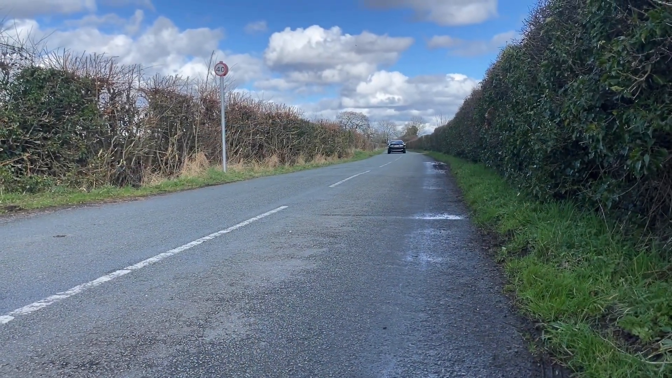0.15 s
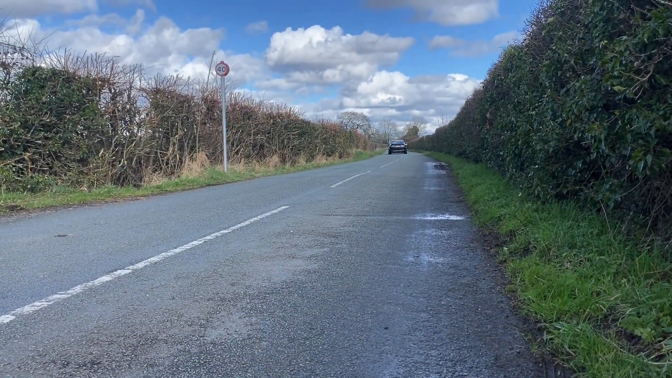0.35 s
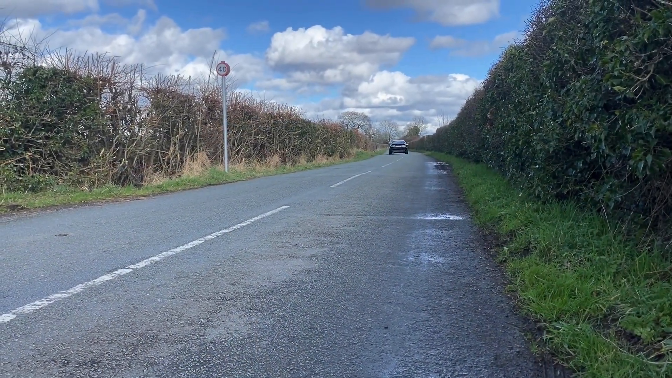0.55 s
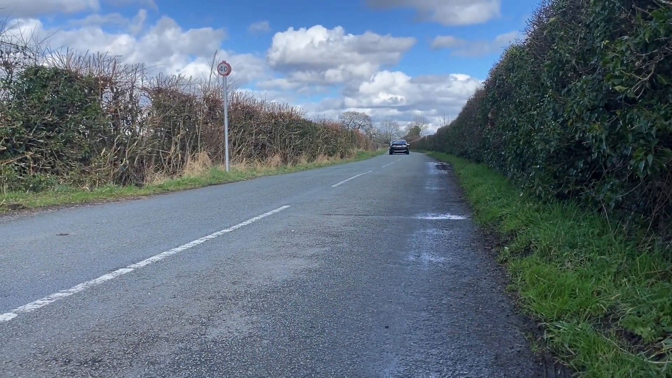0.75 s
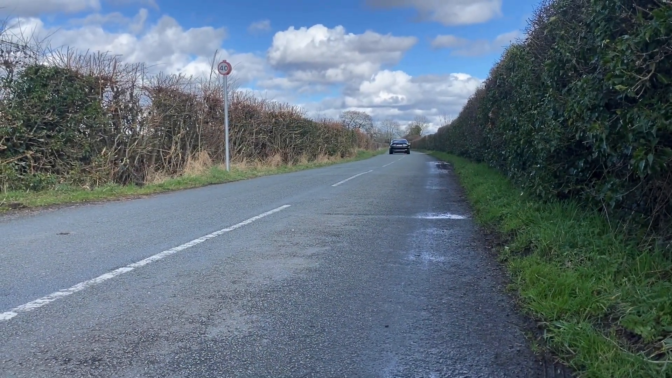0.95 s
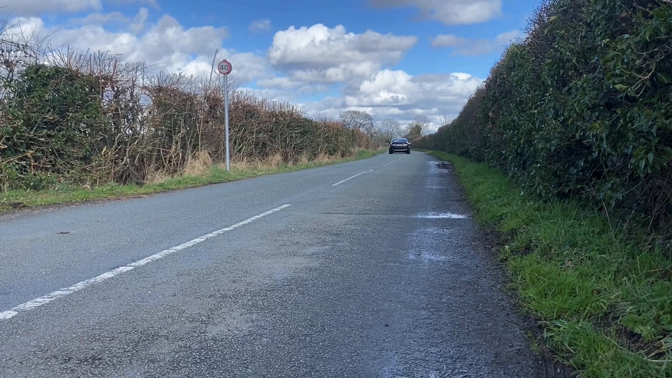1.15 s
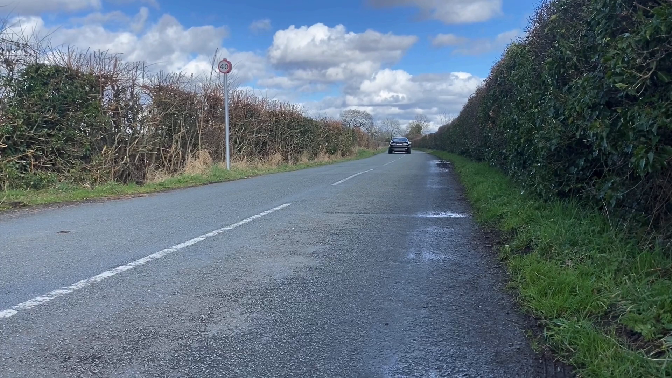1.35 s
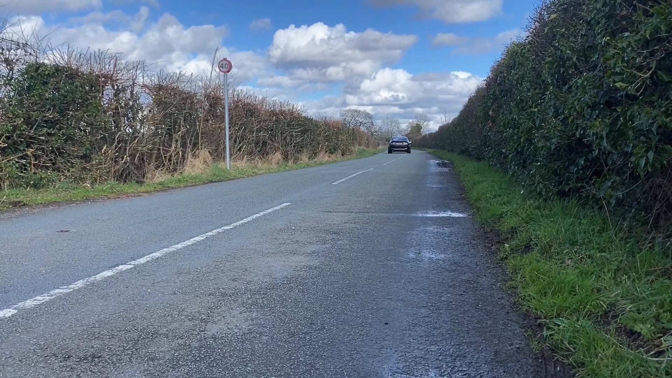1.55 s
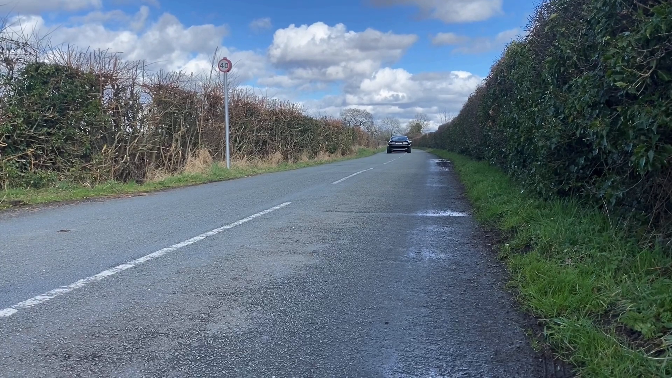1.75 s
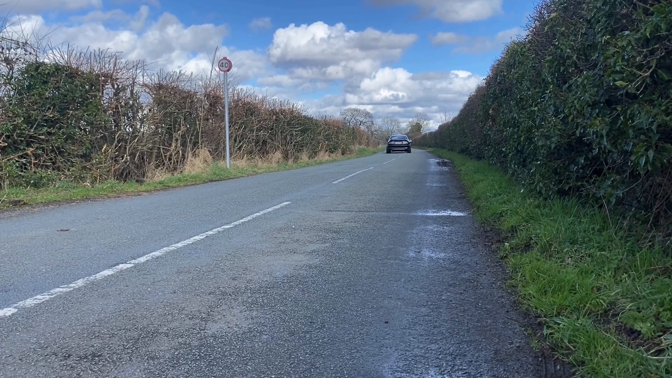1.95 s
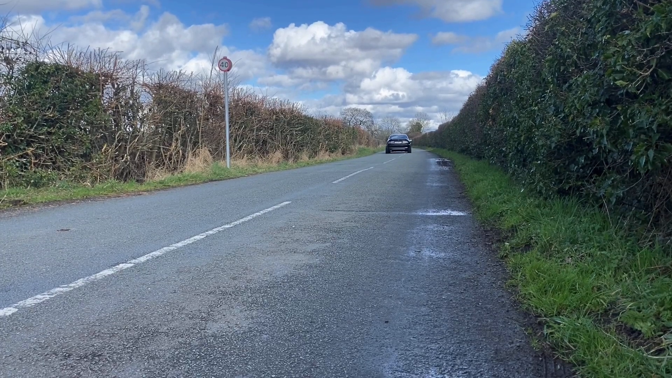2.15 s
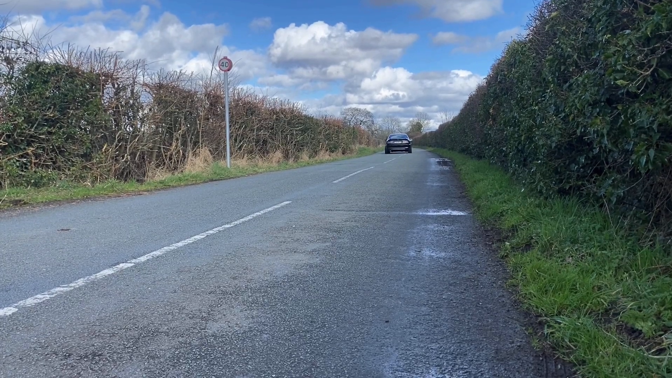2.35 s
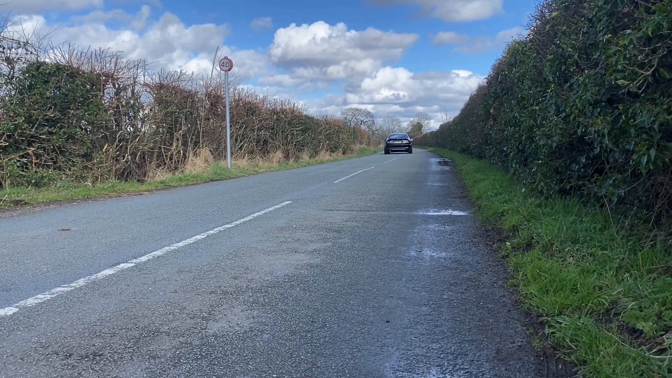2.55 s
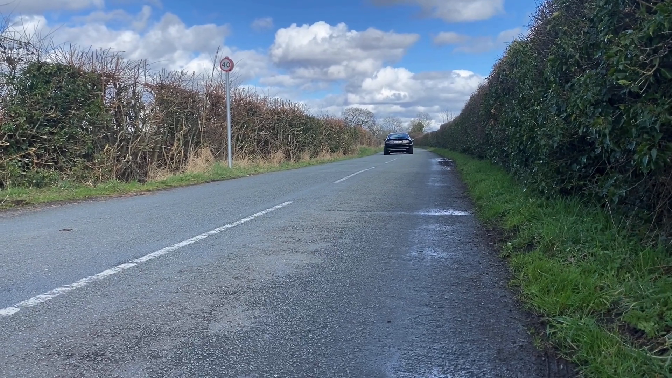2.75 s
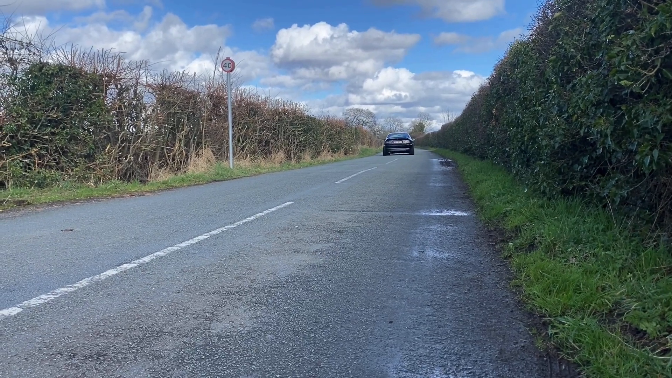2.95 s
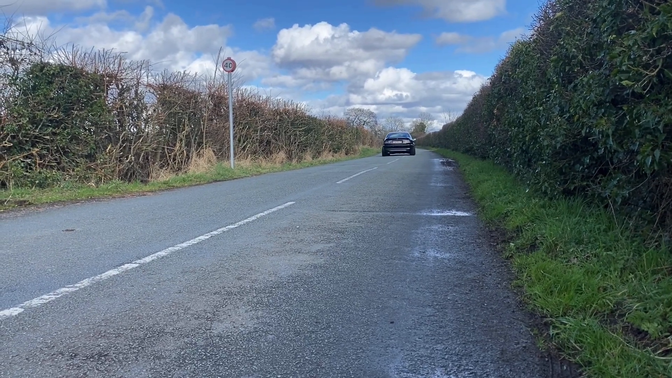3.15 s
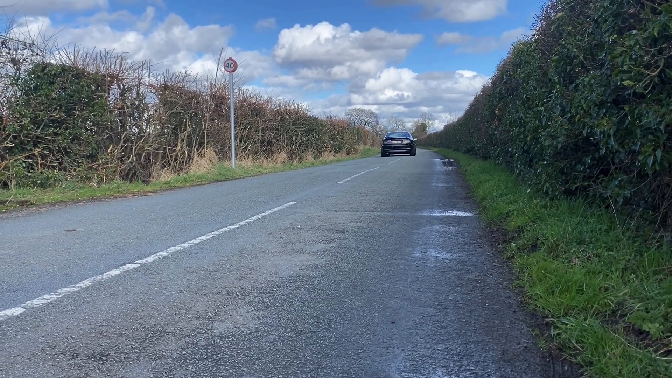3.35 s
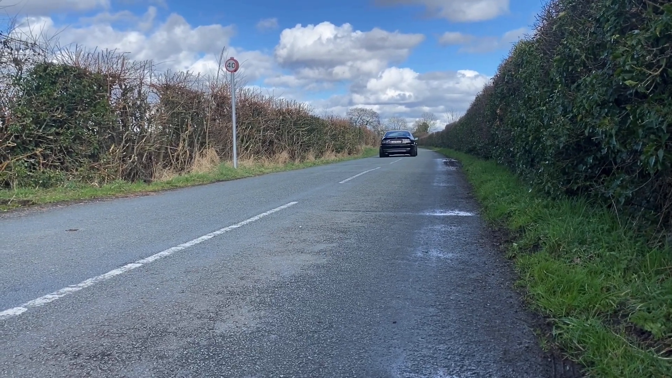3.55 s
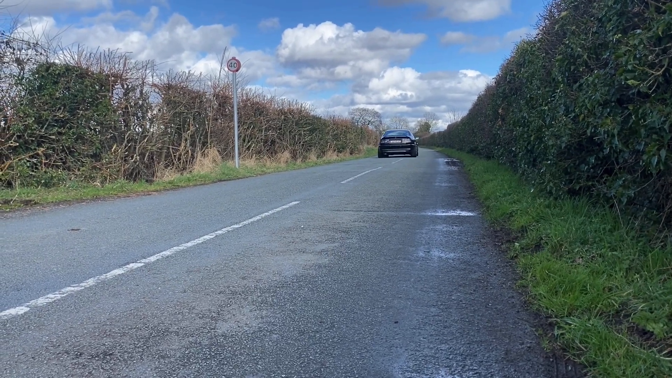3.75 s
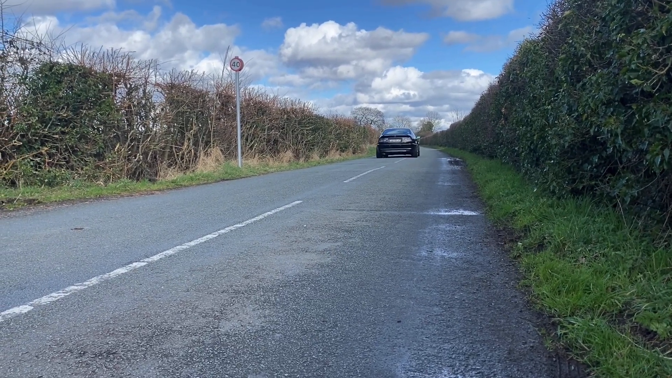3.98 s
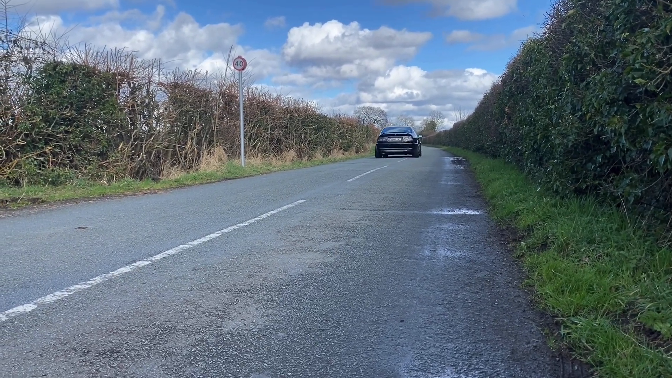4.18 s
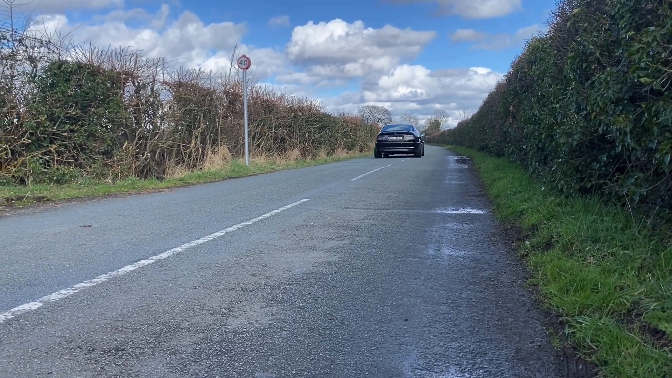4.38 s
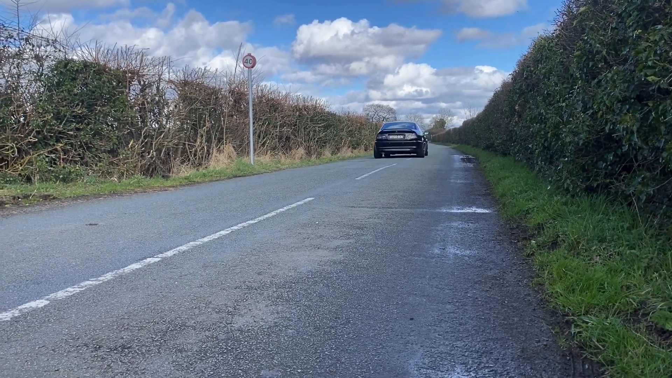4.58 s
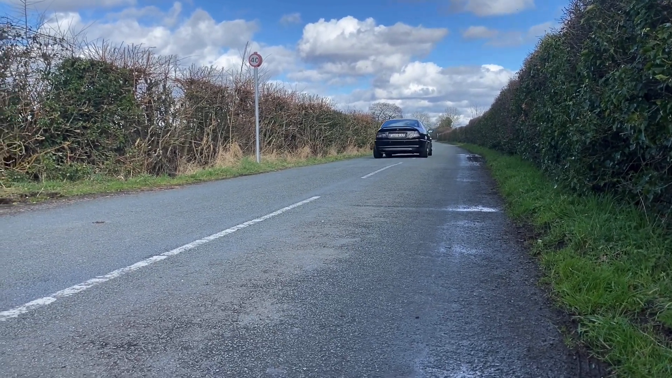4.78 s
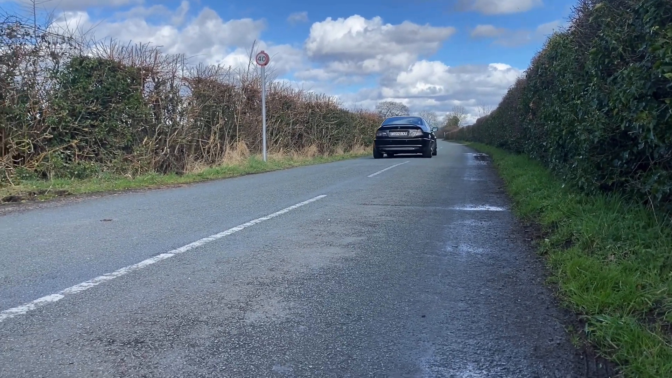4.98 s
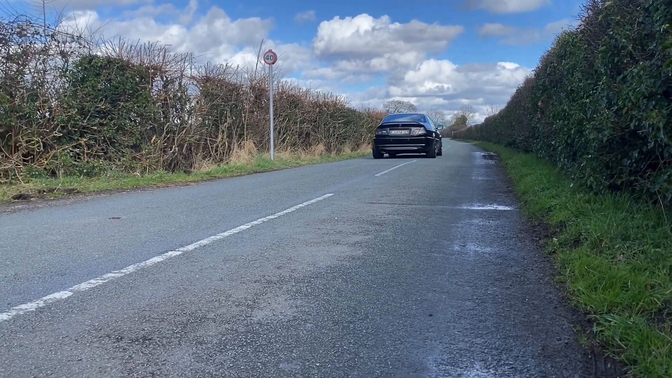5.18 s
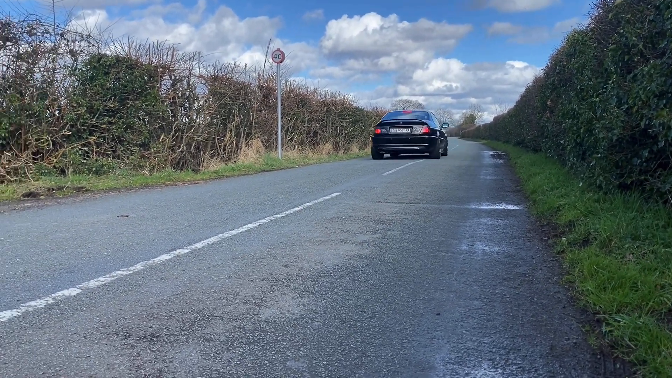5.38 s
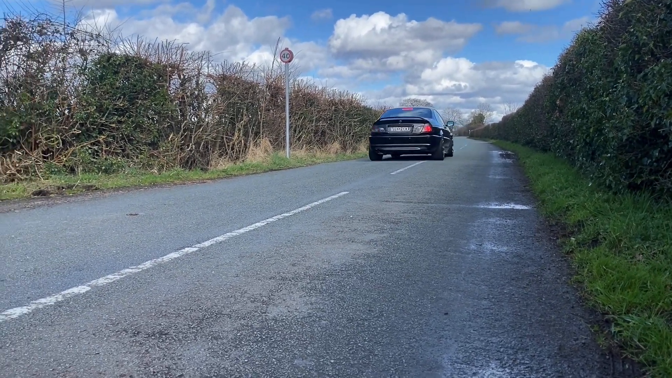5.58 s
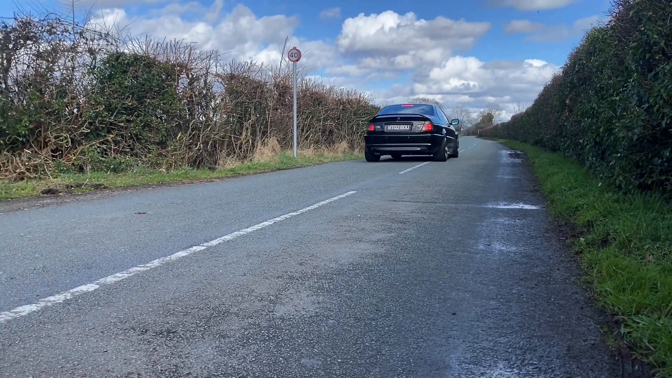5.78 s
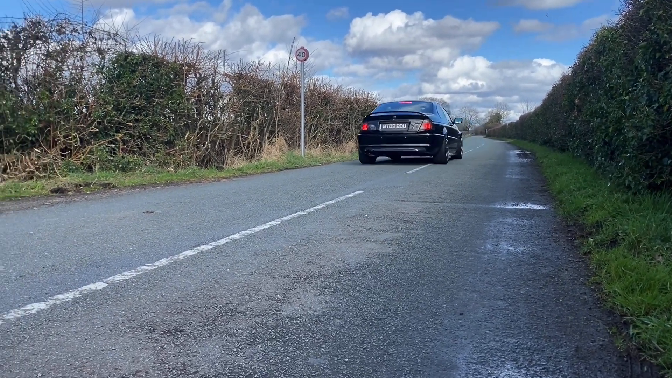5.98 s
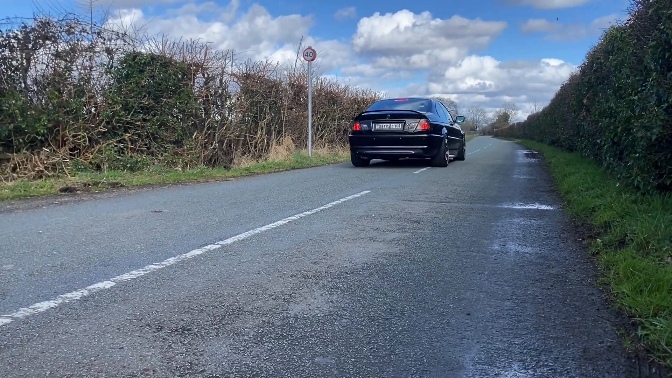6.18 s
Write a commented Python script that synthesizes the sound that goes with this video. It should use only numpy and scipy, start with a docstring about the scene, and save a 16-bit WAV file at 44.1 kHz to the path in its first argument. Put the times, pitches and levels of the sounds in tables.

```python
"""A six-cylinder engine, firing unevenly, rings its exhaust as a car backs nearer along a hedged lane,
lifts off and slows. The strongest orders are sines, one of them the whine of a reverse gear.
Unburnt fuel thuds in the silencer (swelling sines), cracks at the tailpipe (decaying modes)
and spits there (noise bursts). Gas and tyres hiss and leaves stir as filtered noise;
the hedges return short echoes of the cracks."""
import sys
import numpy as np
from scipy import signal
from scipy.fft import rfft, irfft, next_fast_len
from scipy.io import wavfile
from scipy.ndimage import uniform_filter1d

SR = 44100
rng = np.random.default_rng(int(sys.argv[2]) if len(sys.argv) > 2 else 0)


def invert_db(x):
    """Field ratio 10**(x/20) for x, a level in decibels (scalar or array-like)."""
    u = np.asarray(x, float) / 20
    return 10 ** u


def generate_wav(signal):
    """Clip the signal to [-1, 1] and save it as 16-bit WAV at the path in sys.argv[1]."""
    frames = np.transpose(np.atleast_2d(signal))
    scaled = np.clip(frames, -1, 1) * 32767
    pcm = np.round(scaled).astype(np.int16)
    wavfile.write(sys.argv[1], SR, pcm)


N = 274654
T = np.arange(N) / SR

# Engine states: steady, lifting off, ragged overrun, pulling again.
# One row a change between them: start t/s, end t/s
CHANGES = [(2.2, 2.85), (3.64, 3.85), (5.7, 5.8)]
# Engine speed: t/s, firing rate f/Hz
FIRING_RATE = [(0, 164.8), (.1, 165.7), (.25, 163.9), (.45, 165.8), (.62, 164.6), (.78, 165.4),
               (1.35, 165.7), (1.55, 164.7), (1.9, 163.6), (2.17, 164.1), (2.4, 162.6), (2.62, 162.7),
               (2.85, 159.1), (3.12, 158.9), (3.25, 156.5), (3.65, 152.9), (3.88, 148.4), (4.25, 144.8),
               (4.45, 139.5), (5.07, 125.5), (5.3, 119.5), (5.46, 118.7), (5.6, 111.6), (5.76, 104.4),
               (5.9, 99.45), (6, 97.6), (6.12, 93.4), (6.23, 86.8)]
# Approach of the car: t/s, exhaust level/dB, drone level of the silencer chambers/dB
NEARING = [(0, -35, -43.5), (.55, -34.5, -42), (1.5, -31.5, -45), (2.7, -29.5, -40), (3.3, -27, -30),
           (3.6, -24.5, -27), (3.76, -27.5, -29.5), (4.1, -23, -27), (4.55, -17, -27), (5.15, -13.5, -22),
           (5.45, -8.5, -30.5), (5.7, -15.5, -40), (6.23, -14.5, -24.5)]

# Cylinders: strength level/dB, lateness/share of the firing gap
CYLINDERS = [(7, 0.037), (1.5, 0.12), (3.5, -0.0066), (-1.5, 0.21), (4, 0.21), (3, 0.011)]
# Exhaust response: f/Hz, relative level per Hz/dB
EXHAUST = [(24, -56), (40, -5), (87, 10.5), (135, -4.5), (170, 1), (192, -16.5), (218, -21.5), (247, -0.5),
           (274, -7), (329, 1), (355, -8.5), (390, -18.5), (425, -11), (481, -9), (535, -11.5), (747, -0.5),
           (981, -34), (1500, -31), (1950, -62.5), (3300, -120)]
THROB_DB = (-2.5, -2, 1.5, -4)  # over the exhaust level, in each state
SCATTER_DB = (.8, 2.5, 3.5, 1)  # unevenness of the firings in each state
BITE_DB, DULLING_DB_PER_S = (0, -3, -8, -6), 1.5  # throb above 500 Hz by state; it dulls through the overrun
DRIFT_DB, DRIFT_CYCLES = 1.2, 8  # slow wander of each cylinder's strength; a cycle is six firings
CALMING_S, CALMING_DB = (4.9, 5.35), 5  # throb and rumble ease late in the overrun

# Orders that sing clean: multiple of the firing rate
SINGING_ORDERS = (1.5, 2, 2.5, 3, 19 / 6, 3.5, 11 / 3, 4, 4.5, 14 / 3, 31 / 6, 16 / 3, 5.5, 6.5, 7, 10)
# One row an order, one column a state: level over the exhaust level/dB
ORDER_LEVELS = [(-7.5, -16.5, -18.5, -13.5), (-17.5, -8.5, -18, -11), (-40.5, -40.5, -24.5, -18),
                (-10.5, -12, -28, -14.5), (-24, -25.5, -37.5, -38.5), (-15.5, -29, -35, -24.5),
                (-20, -22.5, -34, -33), (-22, -23, -29.5, -35), (-26, -27.5, -40.5, -20.5),
                (-12, -24, -42.5, -45.5), (-20, -23, -48.5, -48), (-12, -22.5, -54, -50.5),
                (-25, -36.5, -34.5, -23.5), (-39, -44, -43, -37), (-46, -42, -38.5, -24),
                (-29, -30, -59.5, -54.5)]
# A line swells as it slides through these resonances: f/Hz, width f/Hz, rise of level/dB
SWELLS = [(186.5, 15, 5), (326, 58, 7), (427, 32, 12), (475, 8.4, 2)]
FLUTTER_DB = (1, .7, 1.2, .4)  # slow wander of the orders in each state

# Clean boom at the firing rate: t/s, rms level/dB outside the stumbles
BOOM = [(0, -48), (1.5, -41.5), (2.6, -40.5), (3.5, -31.5), (4.3, -23.5), (4.8, -18.5), (5.0, -12.5),
        (5.25, -11), (5.32, -13.5), (5.45, -8.5), (5.6, -9.5), (5.68, -12), (5.78, -12.5), (5.9, -8),
        (6.23, -10)]
# The boom drops out for a few firings: t/s, depth of level/dB
STUMBLES = [(4.2, 9), (4.75, 1), (4.96, 16.5), (5.039, 8), (5.14, 30.5), (5.185, 4.5), (5.277, 23),
            (5.483, 26.5), (5.51, 25), (5.64, 11), (5.727, 24)]
STUMBLE_S = 0.0098  # from the deepest point to 1/e of the depth in dB

# Resonances of the silencer excited by uneven burning: f/Hz, width of one pass f/Hz, relative level/dB
RUMBLE = [(65.7, 34, 0.5), (104.4, 53, -2.5), (122, 92, -14)]
# Resonances of the droning chambers: f/Hz, width of one pass f/Hz, relative level/dB
CHAMBER = [(175, 34, -8), (316, 60, -10), (453.4, 70, -12)]
RUMBLE_DB = (-9, -11, -8, -22)  # over the exhaust level, in each state

# Spectrum of the gas: f/Hz, relative level per Hz/dB
GAS_SPECTRUM = [(600, -14.5), (900, 5.5), (960, -4), (1070, 0.5), (1200, -3.5), (1360, -9.5), (1510, -6.5),
                (2000, -9.5), (2600, -12), (2930, -23), (3260, -19.5), (4500, -65.5)]
# Gas hiss: t/s, level/dB
GAS_LEVEL = [(0, -48.5), (.5, -46), (1.4, -44.5), (2.5, -44), (3.5, -42), (4.4, -40), (5.5, -39.5),
             (5.65, -44.5), (5.85, -41.5), (6.05, -39), (6.23, -39)]
# Spectrum of the tyres: f/Hz, relative level per Hz/dB
TYRE_SPECTRUM = [(2500, -21), (3000, -8), (3400, 2), (4300, -1.5), (5200, -5.5), (6500, -10.5),
                 (9000, -58.5)]
# Spectrum of the highest hiss: f/Hz, relative level per Hz/dB
AIR_SPECTRUM = [(4500, -24), (6000, 0.5), (7800, 4), (9000, -25.5), (10000, -5.5), (12000, -4.5),
                (13000, -20.5), (15500, -24)]
# The air eats the treble while the car is far:
# dB over the gas at the start, dB gained by 4.8 s, share of it gained by 1.7 s
TYRES_CLEARING, AIR_CLEARING = (-28, 8.1, 0.62), (-51, 24.9, 0.38)

# Leaves stirring in the hedge: t/s, half length of a puff t/s, level/dB
RUSTLES = [(.14, .006, -84), (.64, .006, -81), (1.6, .05, -82), (1.72, .04, -80), (1.83, .04, -85),
           (2.05, .06, -81)]
# Spectrum of the leaves: f/Hz, relative level per Hz/dB
LEAF_SPECTRUM = [(5000, -31), (6800, -4), (8000, 3), (9000, -7.5), (10500, 0), (12000, -1), (13500, -43.5)]

# Afterfire in the silencer: t/s, level at the swell's top/dB, f/Hz
THUDS = [(1.345, -29, 77.6), (1.753, -22, 90.6), (2.048, -22.5, 85), (2.49, -41, 87.95), (2.628, -40, 90),
         (2.777, -28, 104), (2.898, -22, 104), (3.048, -22.5, 78.3), (3.312, -19, 95), (3.395, -22, 100),
         (3.474, -20, 96), (3.518, -17, 109.6), (3.586, -15, 99.3), (3.631, -24, 111), (3.771, -18, 107),
         (3.827, -26.5, 103), (3.87, -15, 97), (3.908, -15, 117.7), (4.038, -14, 103), (4.198, -17.5, 115),
         (4.243, -14.5, 99), (4.42, -12.5, 92), (4.548, -10, 114.3), (4.687, -21, 88.4), (4.759, -5.5, 87),
         (4.917, -12, 103.7), (5.039, -11.5, 103), (5.111, -11, 95.2), (5.289, -8, 81.5), (5.418, -11, 90),
         (5.502, -10.5, 75), (5.621, -3.5, 107)]
THUD_RISE_CYCLES = 0.93

# Clear afterfire at the tailpipe: t/s, peak level/dB, sharpness (gain of the modes above 1 kHz)/dB
CRACKS = [(1.765, -22.5, -33), (1.775, -22, -31.5), (2.052, -24.5, -29), (2.068, -25, -31),
          (2.785, -25.5, -30), (2.908, -26, -28.5), (3.05, -17.5, -34), (3.303, -23.5, -29),
          (3.36, -23, -32), (3.393, -18.5, -33), (3.478, -24, -32), (3.51, -17.5, -35), (3.588, -16.5, -29),
          (3.635, -19.5, -30), (3.69, -25, -28), (3.774, -25.5, -29.5), (3.812, -27.5, -33),
          (3.853, -20, -21.5), (3.876, -20, -32), (3.907, -16.5, -30.5), (3.917, -12.5, -31.5),
          (3.948, -14.5, -29), (3.99, -8.5, -26), (4.002, -14.5, -25), (4.031, -15.5, -26.5),
          (4.096, -22, -19.5), (4.118, -24, -20.5), (4.137, -21.5, -20), (4.154, -12.5, -36),
          (4.196, -14.5, -30.5), (4.205, -13.5, -29), (4.281, -14.5, -24), (4.305, -18.5, -17),
          (4.337, -10.5, -31), (4.364, -20.5, -20), (4.381, -14.5, -24), (4.423, -2.5, -20),
          (4.48, -9.5, -28), (4.495, -14.5, -27), (4.525, -21, -25), (4.569, -22.5, -25),
          (4.596, -16.5, -21), (4.618, -19, -24.5), (4.642, -11.5, -25), (4.651, -13.5, -33),
          (4.703, -15.5, -18), (4.737, -9, -17.5), (4.761, -3.5, -8), (4.809, -12.5, -20),
          (4.868, -25.5, -16.5), (4.882, -13.5, -20), (4.914, -6.5, -31), (4.943, -8.5, -27),
          (4.96, -7.5, -24), (4.976, -20, -24), (4.993, -18, -28.5), (5.029, -3.5, -16),
          (5.071, -22.5, -25), (5.101, -7.5, -32), (5.108, -5.5, -24), (5.147, -19.5, -15.5),
          (5.171, -13.5, -21), (5.253, -1.5, -13), (5.262, -5.5, -16), (5.279, -7.5, -28),
          (5.294, -11.5, -36), (5.347, -24, -22), (5.381, -13.5, -27), (5.404, -1, -8.5),
          (5.448, -12.5, -28), (5.463, -5.5, -16.5), (5.48, -12, -20), (5.498, -3.5, -24),
          (5.537, -15, -24), (5.554, -21.5, -18), (5.59, -16, -30), (5.61, -15, -32), (5.6147, 1.5, -16.5),
          (5.625, -11, -35), (5.661, -21.5, -20), (5.68, -15.5, -28), (5.696, -6, -25), (5.715, -16, -30),
          (6.1, -19, -33), (6.164, -18, -30.5)]
# Tailpipe modes: f/Hz, relative level/dB, decay by 60 dB for a crack at or above 0 dB t/s
TAILPIPE = [(240, -12.5, .04), (317, -5, 0.04), (480, 8, 0.048), (539, 20, 0.043), (642, 32.5, 0.025),
            (730, 19, 0.056), (823, 8.5, 0.0083), (1030, 23.5, 0.014), (1440, 15, 0.01),
            (1730, 26.5, 0.016), (2500, 22, 0.006), (2140, 12, 0.038)]
CRACK_BODY_DB = -5.5  # gain of the modes below 500 Hz for a 0 dB crack; softer ones are rounder
RISE_S, ROUNDING = .00025, .08  # rise of the sharpest blow; log growth per dB of sharpness below -12 dB
SMALL_CRACKS_PER_S = (0, 4, 3, 3)  # in each state
SMALL_CRACK_DB, SMALL_SHARP_DB = (1.5, -0.5, -8, 1.5), -30  # typical level over the exhaust, sharpness
# Hedge echoes of the cracks: delay t/s, left level/dB, right level/dB
HEDGES = [(.0035, -12, -13), (.0095, -9, -10.5), (.017, -17, -16), (.026, -19, -21), (.041, -23, -22)]

# Burning gas spits from the tailpipe; levels precede the filter and gain of spits():
# t/s, snap level/dB, fizz level/dB, fizz decay t/s
SPITS = [(4.425, -44.5, -57, 0.01), (4.745, -47, -54, 0.013), (4.76, -50.5, -57.5, 0.027),
         (4.924, -41, -53.5, 0.015), (5.108, -48.5, -43.5, 0.022), (5.254, -50, -40.5, 0.025),
         (5.297, -46.5, -49, 0.018), (5.41, -39.5, -45.5, 0.019), (5.466, -46.5, -62, 0.011),
         (5.6132, -27, -37.5, 0.015), (5.694, -52, -64, .012)]
# Filter of the spits: f/Hz, gain level/dB
SPIT_SPECTRUM = [(900, -23.5), (1400, 13), (2200, 6), (2900, -4), (4000, -9), (7000, -12), (9000, -25),
                 (11000, -14), (15500, -34)]
SPREAD = .4  # separate noise in each ear, relative to the common noise

# Stereo balance: f/Hz, left minus right level/dB
BALANCE = [(60, -2), (500, -0.94), (1500, -0.3), (4000, 1.5), (10000, 1)]
# Stereo phase: f/Hz, lead of the left/rad
LEAD = [(150, .01), (430, 0.16), (690, 0.51), (950, 0.14), (1210, .1), (2400, .01), (3000, 0.24),
        (6000, .5), (10000, .9)]
PEAK = 1.05  # ceiling that the rounded peaks approach


def level(x, db):
    """Rms normalisation: scale a signal to a mean power."""
    return x * invert_db(db) / np.sqrt(np.mean(x ** 2))


def read(table, hz):
    """Logarithmic frequency scale: interpolate a spectrum along it."""
    f, v = np.transpose(table)
    return np.interp(np.log(np.maximum(hz, 1)), np.log(f), v)


def curves(table):
    """Linear interpolation in time: columns of a table at every sample."""
    s, *columns = np.transpose(table)
    return [np.interp(T, s, c) for c in columns]


def by_state(values):
    """Piecewise-linear blend: a value for each engine state, joined across the changes."""
    return np.interp(T, np.ravel(CHANGES), np.repeat(values, 2)[1:-1])


def colour(x, table):
    """Minimum phase: the folded cepstrum yields a causal filter with the table's gain."""
    size = 8192
    cepstrum = irfft(read(table, np.fft.rfftfreq(size, 1 / SR)) * np.log(10) / 20)
    cepstrum[1:size // 2] *= 2
    cepstrum[size // 2 + 1:] = 0
    response = irfft(np.exp(rfft(cepstrum)))
    return signal.fftconvolve(x, response)[:N]


def resonate(x, hz, width):
    """Resonance: a two-pole peak with unit gain at its centre."""
    return signal.lfilter(*signal.iirpeak(hz, hz / width, SR), x)


def walk(rate):
    """Band-limited fluctuation: random levels held 1 / rate s and smoothed twice; spread near 1."""
    k = int(SR / rate)
    held = np.repeat(rng.standard_normal(N // k + 1), k)
    return 1.2 * uniform_filter1d(uniform_filter1d(held, k), k)[:N]


def clicks(s, size):
    """Impulse excitation: each impulse is shared between the two samples around its time."""
    at = np.clip(np.asarray(s) * SR, 0, N - 2)
    i = at.astype(int)
    return np.bincount(i, size * (1 - at + i), N) + np.bincount(i + 1, size * (at - i), N)


def throb(turns):
    """Forced response: one pulse a firing, uneven by cylinder and by chance, rings the exhaust."""
    k = np.arange(1, int(turns[-1]))
    db, late = np.array(CYLINDERS)[k % 6].T
    chance = np.clip(rng.standard_normal((N // 100, 2))[k].T, -2, 2)
    scatter_db = np.interp(k, turns, by_state(SCATTER_DB))
    overrun_s = (T - CHANGES[1][1]) * by_state((0, 0, 1, 0))
    bite_db = by_state(BITE_DB) - DULLING_DB_PER_S * overrun_s
    drift = uniform_filter1d(rng.standard_normal((N // 600, 6)), DRIFT_CYCLES, axis=0).ravel()[k]
    # the drift ends with the overrun; the root restores the spread lost in averaging
    drifting = k < np.interp(CHANGES[2][0], T, turns)
    db = db + DRIFT_DB * np.sqrt(DRIFT_CYCLES) * drift * drifting
    # uneven burning shifts a firing in time as well as in strength
    s = np.interp(k + late + .005 * scatter_db ** 2 * chance[0], turns, T)
    pulses = clicks(s, -invert_db(db + scatter_db * chance[1]))
    pipe = level(colour(pulses, EXHAUST), 0)
    low = signal.sosfiltfilt(signal.butter(2, 500, fs=SR, output="sos"), pipe)
    return low + invert_db(bite_db) * (pipe - low)


def wavering(order, turns, db):
    """Phase modulation: a sine on one order trembles a little."""
    phase = order * (2 * np.pi * turns + .07 * walk(20))
    return np.sqrt(2) * invert_db(db) * np.sin(phase)


def tones(turns, hz):
    """Harmonic orders: sines locked to the firing rate, among them a reverse gear of sixteen teeth."""
    out = 0
    for order, state_db in zip(SINGING_ORDERS, ORDER_LEVELS):
        swell_db = sum(top / (1 + (2 * (order * hz - f) / w) ** 2) for f, w, top in SWELLS)
        flutter_db = 1.0 * walk(25) + by_state(FLUTTER_DB) * walk(5.45)
        out = out + wavering(order, turns, by_state(state_db) + swell_db + flutter_db)
    return out


def boom(turns):
    """Fundamental: a sine at the firing rate drops out where the engine stumbles."""
    db, = curves(BOOM)
    db = db - sum(depth * np.exp(-((T - s) / STUMBLE_S) ** 2) for s, depth in STUMBLES)
    return wavering(1, turns, db + .8 * walk(25))


def rumble(modes):
    """Cavity resonance: gusty noise of uneven burning booms in the silencer's chambers."""
    gusts = rng.standard_normal(N) * invert_db(2.8 * walk(25))
    booms = sum(invert_db(db) * resonate(resonate(gusts, hz, w), hz, w) for hz, w, db in modes)
    return level(booms, 0)


def hiss(spectrum, side_db):
    """Broadband noise: flickering filtered noise, with a side part of opposite sign in each ear."""
    mid, side = (colour(rng.standard_normal(N) * invert_db(0.53 * walk(21)), spectrum) for _ in range(2))
    return level(mid + invert_db(side_db) * side * np.array([[1], [-1]]), 0)


def clearing(start_db, gain_db, early):
    """Air absorption: treble relative to the gas hiss rises as the air path shortens."""
    return start_db + gain_db * np.interp(T, (.9, 1.7, 4.8), (0, early, 1))


def leaves():
    """Amplitude modulation: grainy Gaussian puffs shape the faint treble noise of leaves."""
    shape = sum(invert_db(db) * np.exp(-((T - s) / length) ** 2) for s, length, db in RUSTLES)
    return shape * invert_db(3.0 * walk(60)) * hiss(LEAF_SPECTRUM, side_db=-5.5)


def thuds():
    """Damped oscillation: each late burn swells for about a cycle and dies in the silencer."""
    out, t = np.zeros(N + SR), T[:SR // 5]
    for s, db, hz in THUDS:
        x = t * hz / THUD_RISE_CYCLES
        swell = x * np.exp(1 - x)
        out[int(s * SR):][:len(t)] += invert_db(db) * swell * np.sin(2 * np.pi * hz * t)
    return out[:N]


def by_chance(per_s, turns):
    """Random selection of firings at each state's rate: their samples and two normal numbers each."""
    at = np.searchsorted(turns, np.arange(1, int(turns[-1])))
    pick = rng.random(N // 100)[:len(at)]
    chance = rng.standard_normal((N // 100, 2))[:len(at)]
    hit = pick < by_state(per_s)[at] * np.gradient(at) / SR
    return at[hit], *chance[hit].T


def cracks(turns, near_db):
    """Modal ringing: a fast-rising pressure blow sets off decaying modes of the tailpipe."""
    out, t = np.zeros(N + SR), T[:SR // 10]
    hz, mode_db, t60 = np.array(TAILPIPE).T[:, :, None]
    at, a, b = by_chance(SMALL_CRACKS_PER_S, turns)
    small_db = (near_db + by_state(SMALL_CRACK_DB))[at] + 3.2 * a
    small = zip(at / SR, small_db, SMALL_SHARP_DB + 5 * b)
    for s, db, sharp_db in [*CRACKS, *small]:
        chance = rng.standard_normal((2, len(TAILPIPE), 1))
        tint_db = sharp_db * (hz > 1e3) + (CRACK_BODY_DB - .3 * db) * (hz < 500)
        # softer cracks die sooner
        decay_db = 60 * t / (t60 * invert_db(.25 * min(db, 0)))
        mode = invert_db(mode_db + tint_db + 1.5 * chance[0] - decay_db)
        ring = -(mode * np.sin(2 * np.pi * hz * (1 + .04 * chance[1]) * t)).sum(axis=0)
        rise_s = RISE_S * np.exp(ROUNDING * max(-12 - sharp_db, 0))
        blow = ring * np.tanh(t / rise_s) ** 2
        out[int(s * SR):][:len(t)] += invert_db(db) * blow / np.abs(blow).max()
    return out[:N]


def lane(x):
    """Reflection: the direct sound is followed by a few band-limited echoes from the hedges."""
    dull = signal.sosfilt(signal.butter(2, (350, 1100), "band", fs=SR, output="sos"), x)
    out = np.array([x, x])
    for s, left_db, right_db in HEDGES:
        k = int(s * SR)
        out[:, k:] += invert_db(np.array([[left_db], [right_db]])) * dull[:-k]
    return out


def spits():
    """Transient turbulence: a noise snap and a quickly swelling fizz, partly separate in each ear."""
    out, t = np.zeros((3, N + SR)), T[:SR // 10]
    for s, snap_db, fizz_db, length in SPITS:
        snap = invert_db(snap_db) * np.exp(-t / 0.0023)
        fizz = invert_db(fizz_db) * np.tanh(t / 0.00075) * np.exp(-t / length)
        out[:, int(s * SR):][:, :len(t)] += (snap + fizz) * rng.standard_normal((3, len(t)))
    mid, left, right = (colour(v, SPIT_SPECTRUM) for v in out)
    return invert_db(10.0) * (mid + SPREAD * np.array([left, right]))


def scene():
    """Superposition: engine, afterfire, gas, tyres and leaves add at the two ears."""
    hz, = curves(FIRING_RATE)
    near_db, drone_db = curves(NEARING)
    gas_db, = curves(GAS_LEVEL)
    turns = np.cumsum(hz) / SR  # firings so far
    calm_db = CALMING_DB * np.interp(T, CALMING_S, (0, 1)) * by_state((0, 0, 1, 0))
    exhaust = invert_db(by_state(THROB_DB) - calm_db) * throb(turns) + tones(turns, hz)
    engine = invert_db(near_db) * exhaust + boom(turns)
    # the misfire rumble comes and goes
    rumble_db = near_db + by_state(RUMBLE_DB) - calm_db + 0.97 * walk(3.7)
    drone = invert_db(drone_db + 2 * walk(4.5)) * rumble(CHAMBER)
    silencer = invert_db(rumble_db) * rumble(RUMBLE) + drone + thuds()
    # gas leaves in a puff at each firing, alternate puffs being stronger
    puffs = 1 + 0.098 * np.cos(2 * np.pi * turns) + 0.065 * np.cos(np.pi * turns)
    gas = puffs * hiss(GAS_SPECTRUM, side_db=-12.0)
    tyres = invert_db(clearing(*TYRES_CLEARING)) * hiss(TYRE_SPECTRUM, side_db=-9.5)
    air = invert_db(clearing(*AIR_CLEARING)) * hiss(AIR_SPECTRUM, side_db=-3.5)
    afterfire = lane(cracks(turns, near_db)) + spits()
    return engine + silencer + afterfire + leaves() + invert_db(gas_db) * (gas + tyres + air)


def band_limit(x):
    """A steep low-pass at the top of the band."""
    return signal.sosfilt(signal.butter(12, 15740, fs=SR, output="sos"), x)


def record(dry):
    """Interaural difference and saturation: two ports differ in gain and phase; loud peaks are rounded."""
    size = next_fast_len(N)
    hz = np.fft.rfftfreq(size, 1 / SR)
    # each port takes half of the difference
    tilt = invert_db(read(BALANCE, hz) / 2) * np.exp(.5j * read(LEAD, hz))
    ports = irfft(rfft(dry, size) * np.array([tilt, 1 / tilt]), size)[:, :N]
    mix = PEAK * np.tanh(ports / PEAK)
    return band_limit(mix)


dry = scene()
out = record(dry)
generate_wav(out)
```